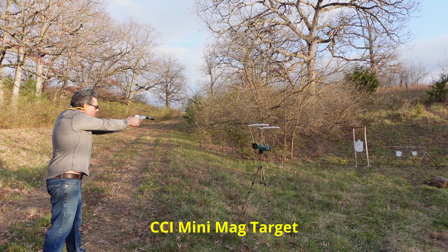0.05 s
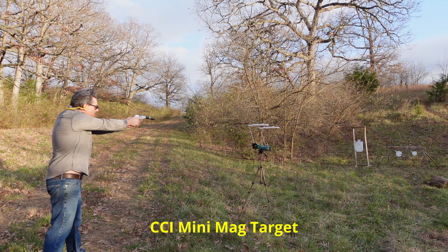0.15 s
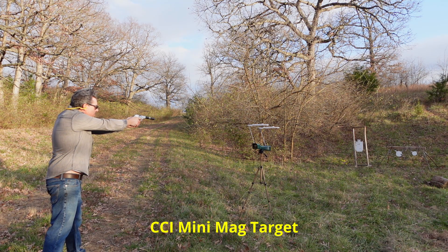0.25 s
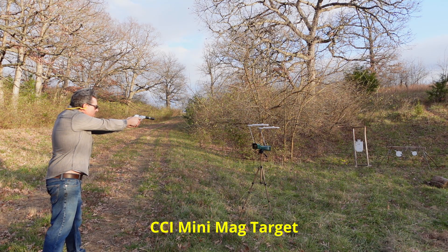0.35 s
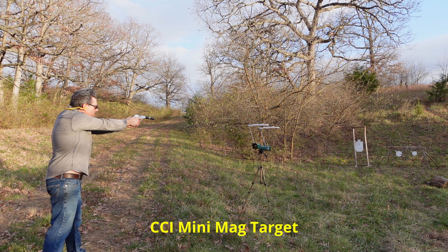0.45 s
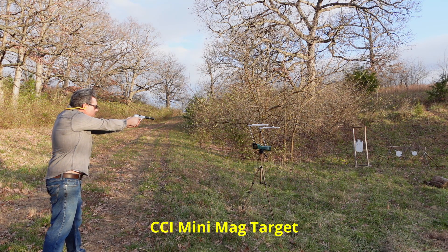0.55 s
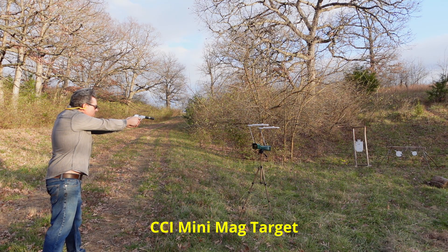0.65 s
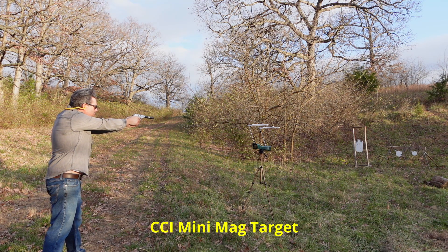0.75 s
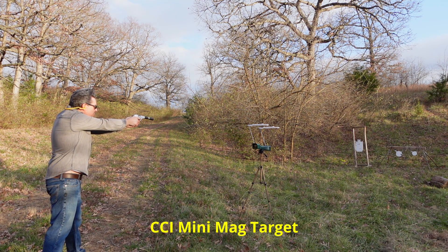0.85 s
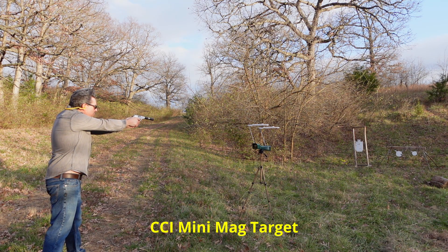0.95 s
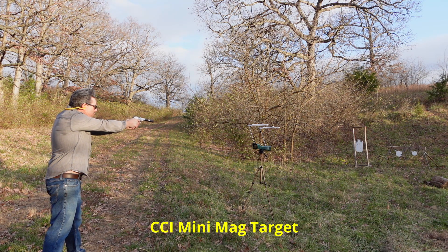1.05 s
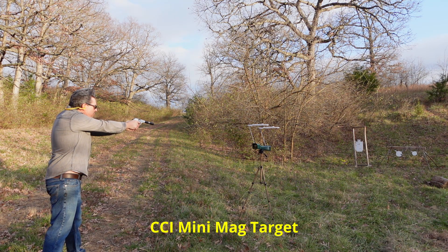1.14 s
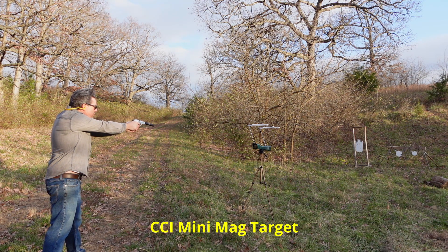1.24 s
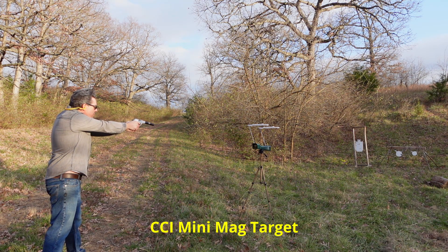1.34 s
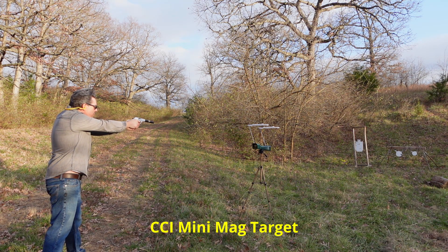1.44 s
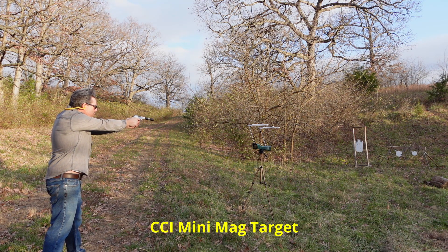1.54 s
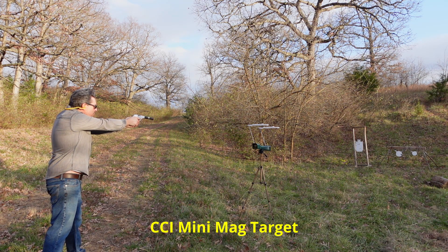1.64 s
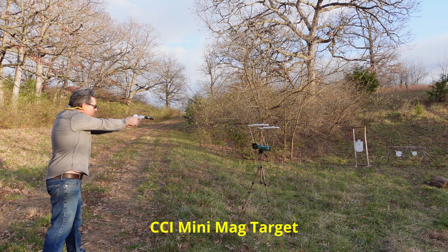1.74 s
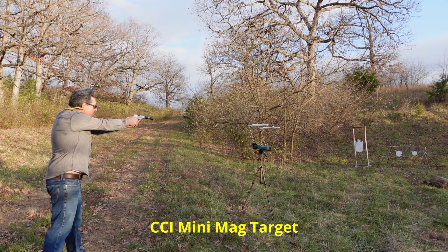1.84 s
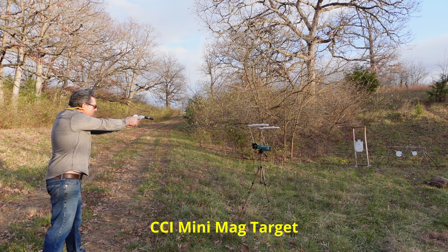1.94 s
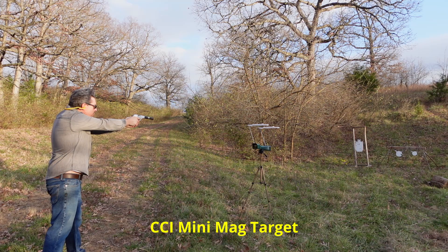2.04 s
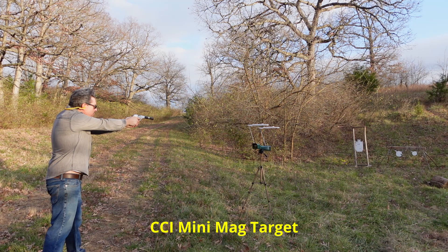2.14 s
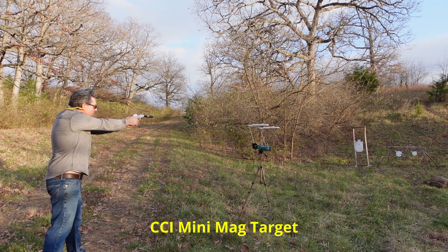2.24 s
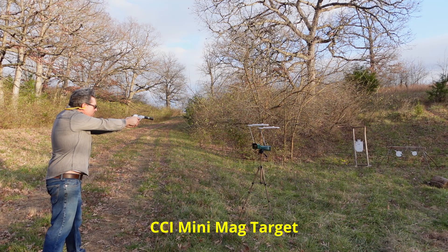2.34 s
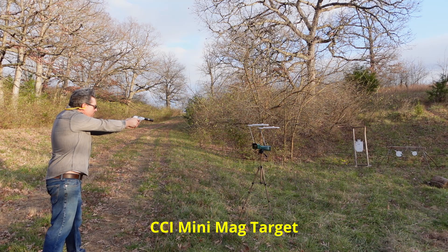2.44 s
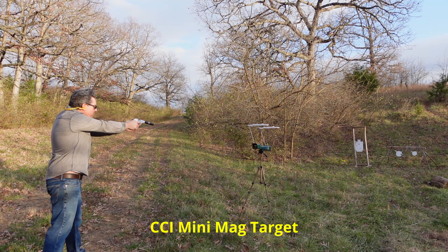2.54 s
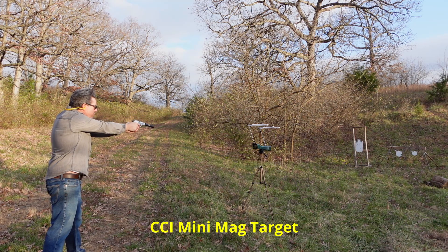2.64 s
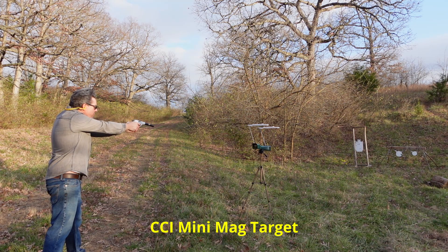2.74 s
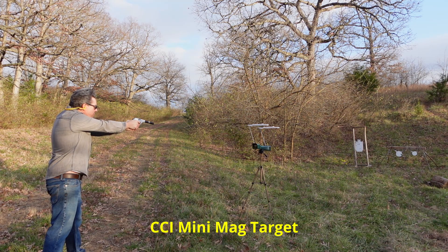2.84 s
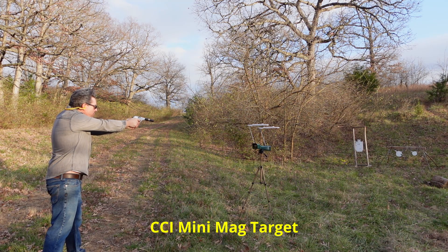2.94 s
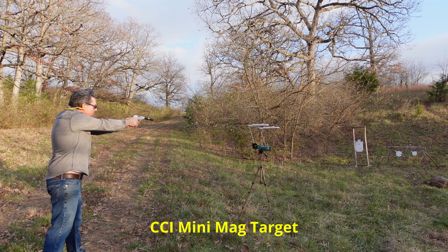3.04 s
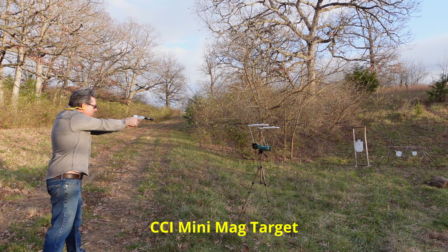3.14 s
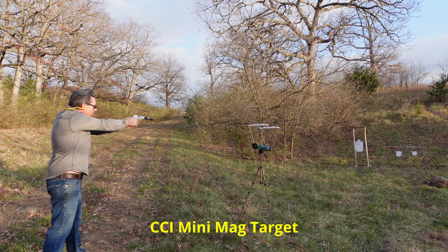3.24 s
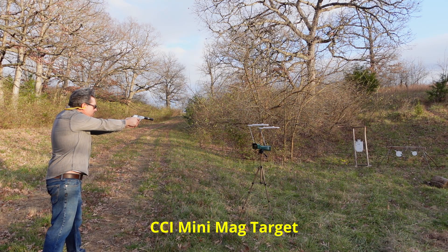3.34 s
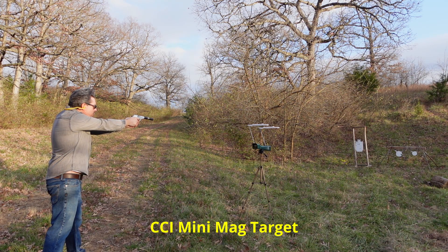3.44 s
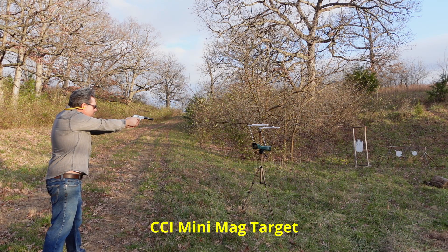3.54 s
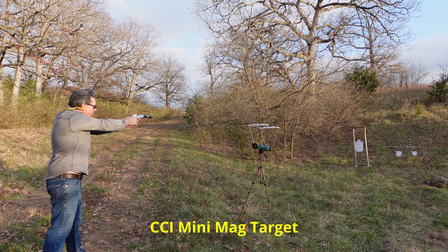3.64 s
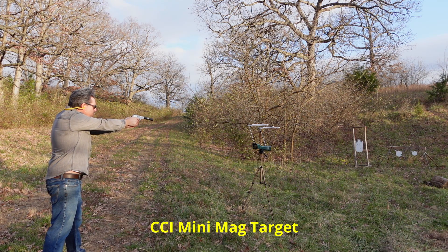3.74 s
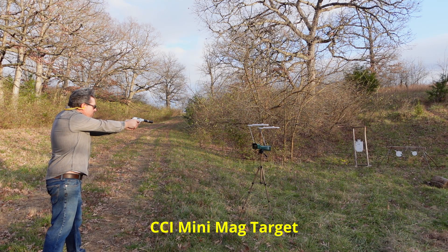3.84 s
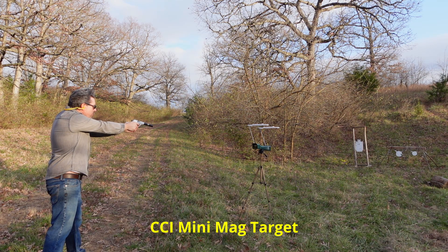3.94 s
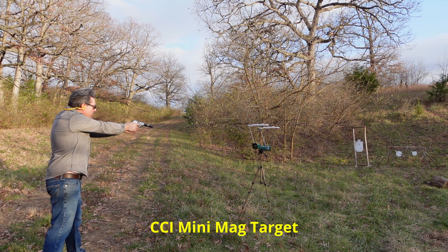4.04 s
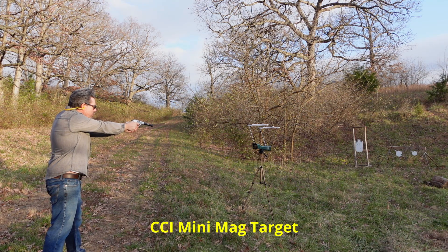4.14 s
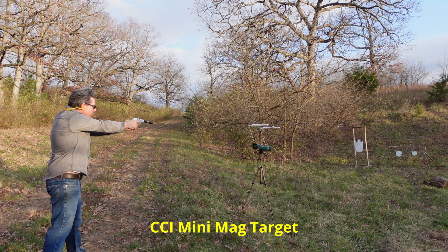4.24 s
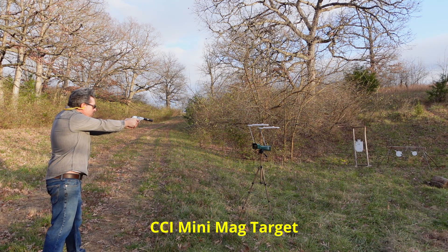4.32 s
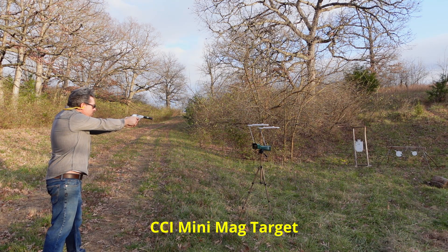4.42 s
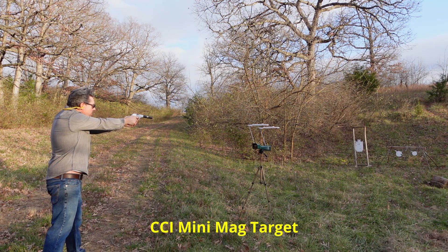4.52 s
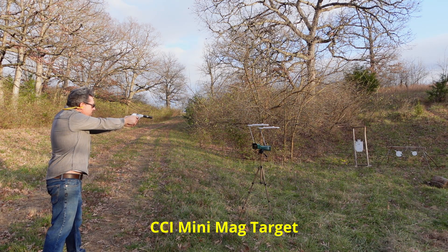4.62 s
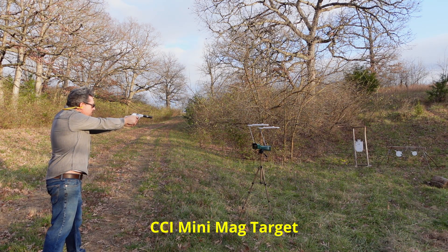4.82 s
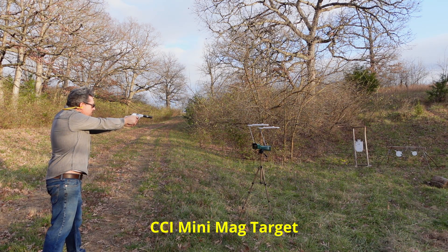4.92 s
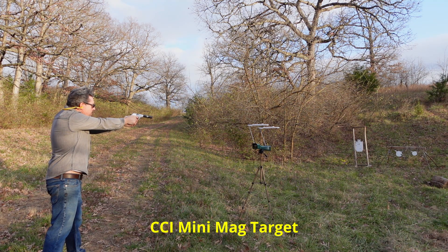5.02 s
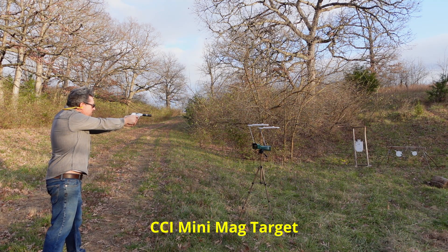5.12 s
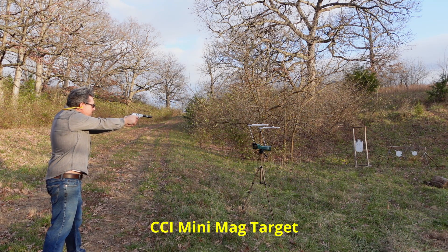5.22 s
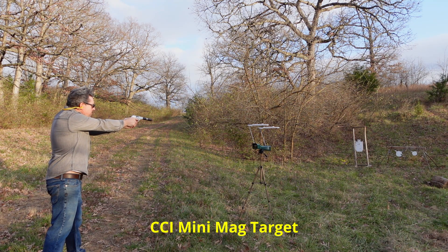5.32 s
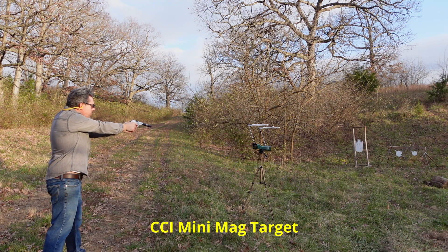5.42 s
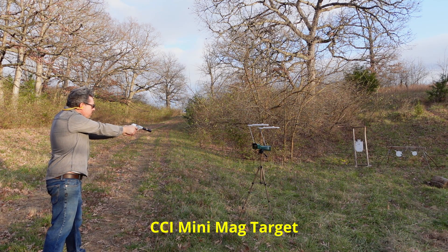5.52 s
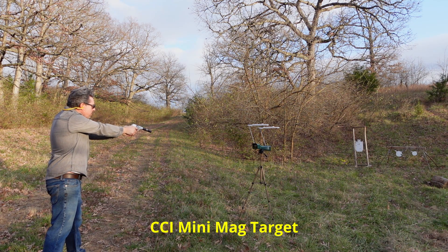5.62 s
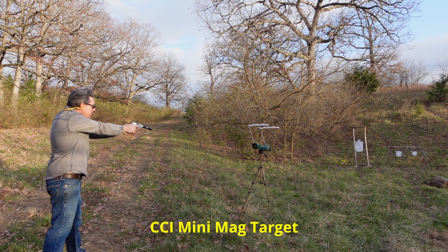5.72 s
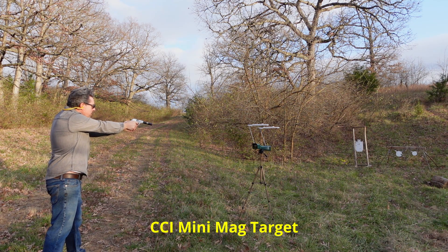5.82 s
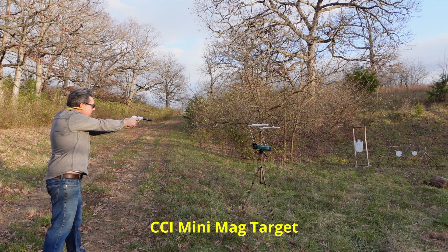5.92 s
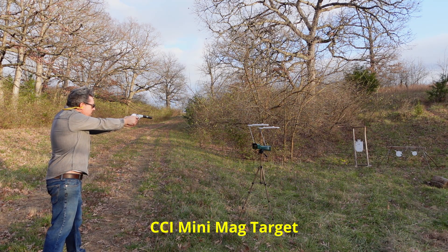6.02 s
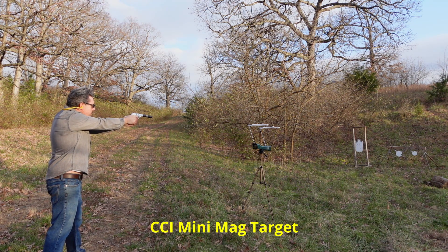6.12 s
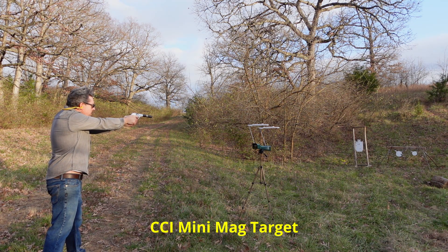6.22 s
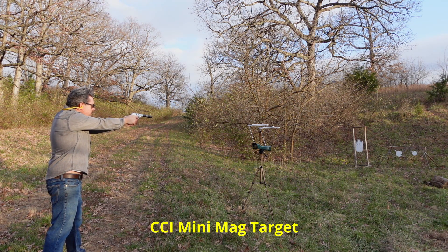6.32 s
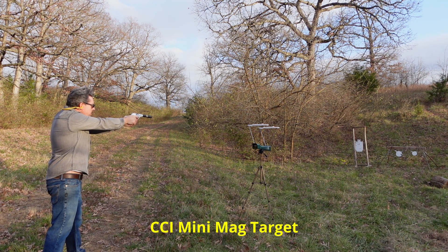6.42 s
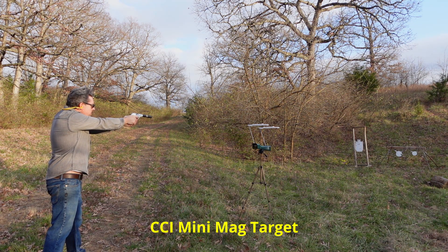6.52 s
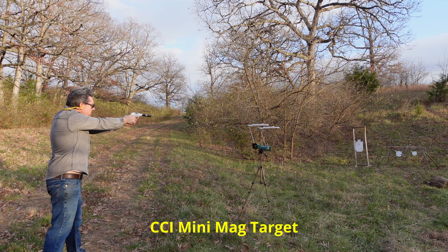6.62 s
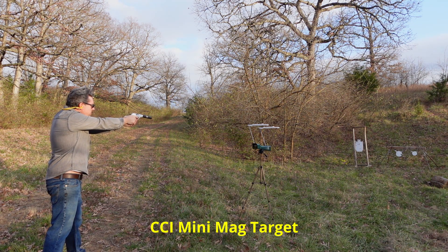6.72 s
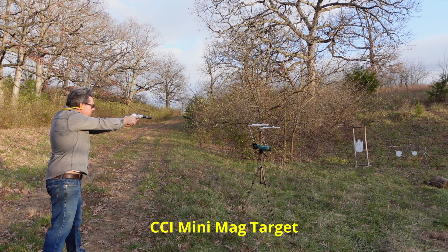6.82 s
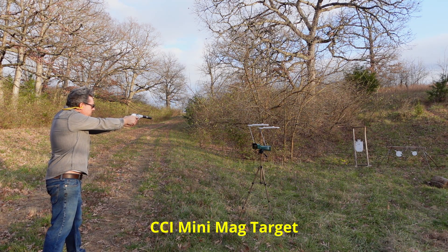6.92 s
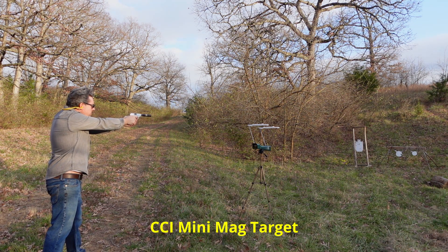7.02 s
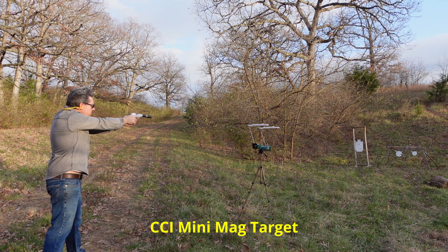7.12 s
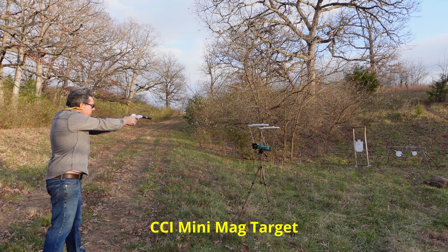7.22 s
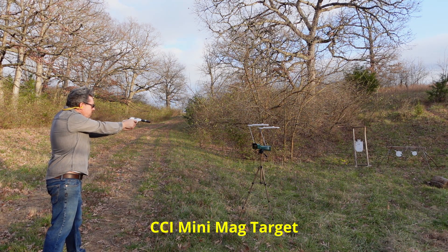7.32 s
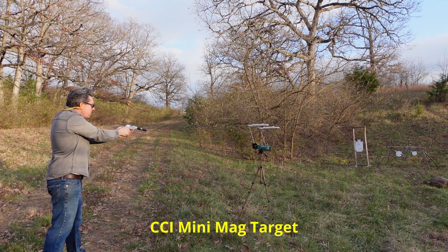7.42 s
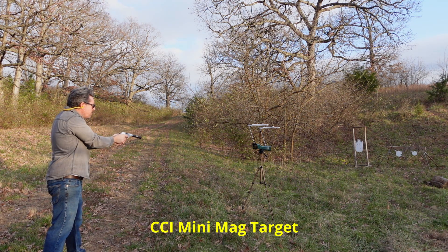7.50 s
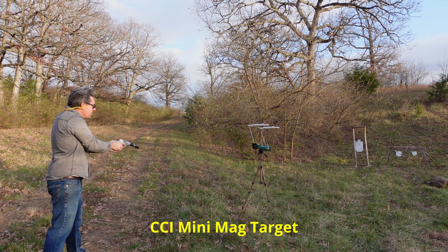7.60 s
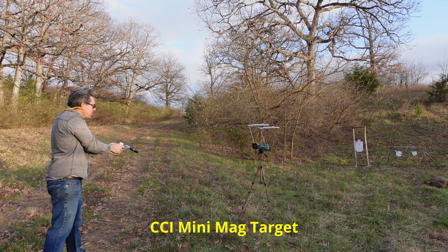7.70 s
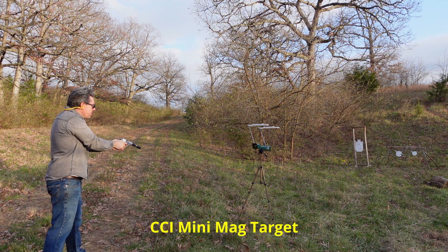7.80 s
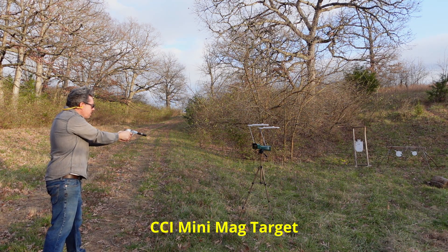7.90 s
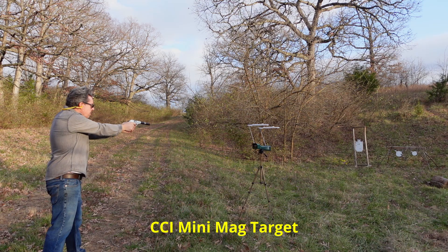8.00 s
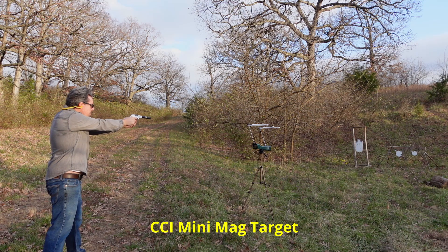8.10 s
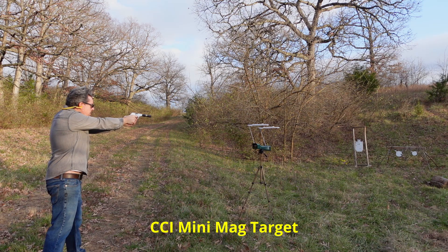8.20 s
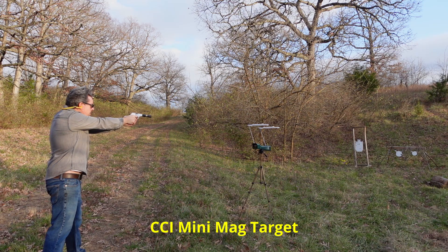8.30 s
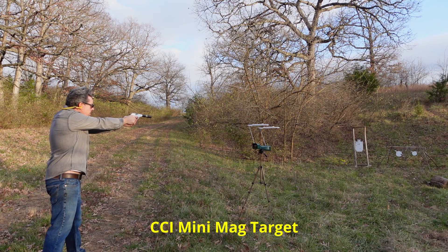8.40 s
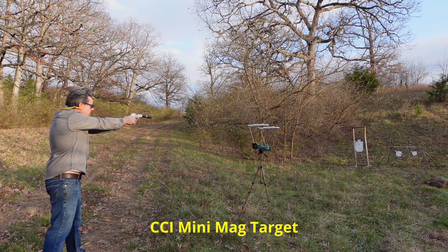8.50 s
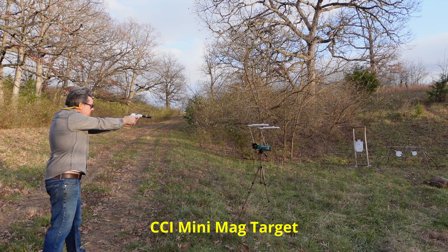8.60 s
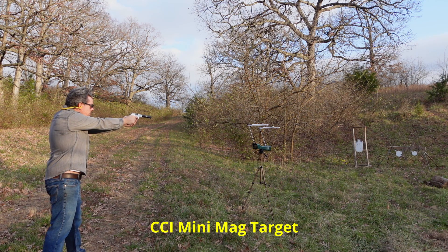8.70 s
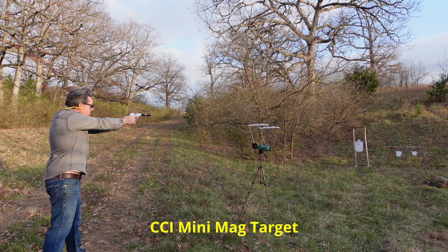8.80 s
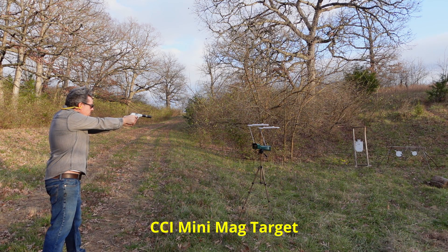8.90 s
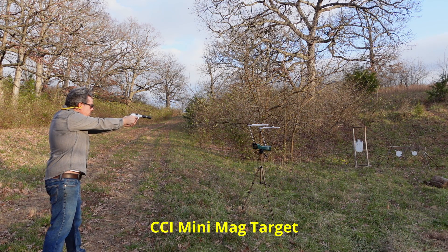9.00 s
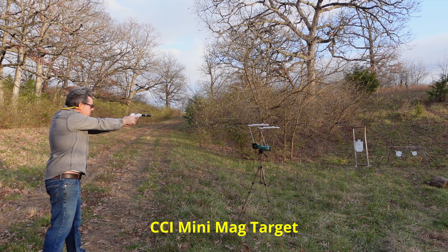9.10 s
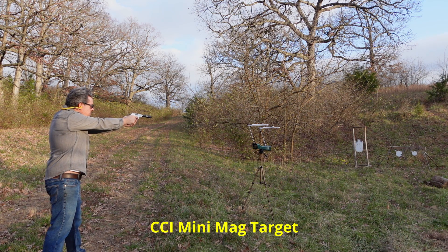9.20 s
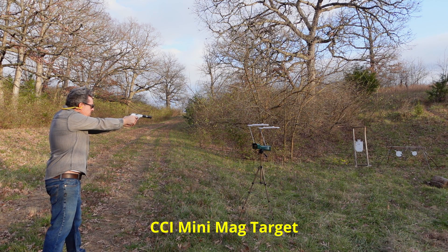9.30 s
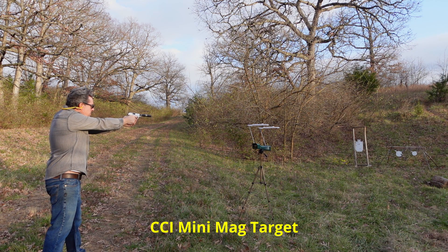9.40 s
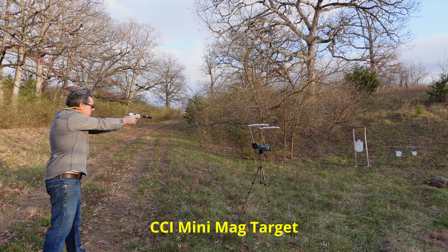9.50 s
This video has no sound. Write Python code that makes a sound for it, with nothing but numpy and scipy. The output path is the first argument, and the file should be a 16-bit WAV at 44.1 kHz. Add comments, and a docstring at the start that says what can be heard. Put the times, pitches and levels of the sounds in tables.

```python
"""A light wind blows over a field and a far bird whistles. Then a small pistol fires, a few metres from a
camera. Each blast scatters off grass and brush, the bullet smacks into an earth bank, and the woods roll
the bang back. Four shots come about a second and a half apart, each followed by a spent case dropping.
In the gaps small birds chirp, dry stalks snap and the camera's lens motor flutters now and then.
Two closer shots follow, more cases land, and three quick shots end the scene."""
import sys
import numpy as np
from scipy import signal
from scipy.fft import rfft, irfft, next_fast_len
from scipy.io import wavfile
from scipy.ndimage import map_coordinates

SR = 44100
rng = np.random.default_rng(int(sys.argv[2]) if len(sys.argv) > 2 else 0)


def log_audio(samples):
    """Write samples as a 16-bit WAV file to the path given in sys.argv[1]."""
    # one column per channel
    frames = np.atleast_2d(samples).T
    # limit to full scale, then quantise
    limited = np.clip(frames, -1, 1)
    pcm = np.round(limited * 32767).astype(np.int16)
    wavfile.write(sys.argv[1], SR, pcm)


N = 421155
CLOCK = np.arange(N) / SR  # seconds through the whole scene
T = np.arange(int(1.6 * SR)) / SR  # seconds through one sound and its echoes


# Each row: start in seconds, blast level in dB, echo level in dB, echo brightness in dB per octave,
# the echo's boosted pitch in Hz, its weakened pitch in Hz, size of that boost and cut in dB,
# seconds until the bullet's hit is heard, smack level in dB, thud level in dB, thud pitch in Hz.
PISTOL_SHOTS = [(0.7063, -0.5, 2, -0.5, 2730, 3500, 5, 0.071, -12, -15, 615),
                (2.2520, 1, 1.7, -0.5, 3460, 6540, 4.5, .0787, -11, -23, 610),
                (3.645, -0.5, 2, -.5, 1310, 1890, 2, 0.067, -15, -17, 600),
                (5.124, -1, 1, 0, 2540, 3095, 4, .0797, -10, -15, 550),
                (6.6042, -.5, 0.8, 0, 3740, 2270, 7, 0.084, -10.5, -4, 616),
                (7.0488, 0, 2, -0.43, 5320, 5000, 5.5, 0.078, -15, -11, 346),
                (8.828, -1.5, 0.95, -0.3, 5500, 2450, 4, .0790, -7.5, -16.5, 595),
                (9.1199, 0, 0.5, -0.5, 5570, 1840, 3, 0.082, -9, -3, 795),
                (9.3973, -0.5, 1.1, -0.4, 6450, 2480, 4.5, 0.082, -5.5, -10.5, 744)]

def pistol(change=0.47):
    """Every shot meets the same land, along paths that the moving air alters a little."""
    out, land = np.zeros(N), landscape()
    for start, db, echo_db, tilt_db, peak_hz, hollow_hz, depth_db, flight, *hit in PISTOL_SHOTS:
        echo = np.sqrt(1 - change) * land + np.sqrt(change) * landscape()
        add(out, start, amp(db) * blast())
        echo_tone = gas_cloud(tilt_db, peak_hz, hollow_hz, depth_db)
        add(out, start, amp(echo_db) * filtered(echo, echo_tone))
        add(out, start + flight, impact(*hit))
    return out


# The sudden jumps in air pressure that begin a bang. Each row: delay in seconds, level in dB,
# fading time in seconds.
SHOCK_FRONTS = [(0, -14, .003), (.0013, -3, 0.0021), (.0025, -12, 0.0014), (.0044, -11.5, .0018),
                (.0100, -24.5, .004)]
# The tone of the sharp crack and of the low push. Each row: frequency in Hz, level in dB.
CRACK_TONE = [(410, -26), (700, -3), (1150, -3), (1680, -3.5), (2330, -4), (2990, -4), (3500, -2.5),
              (4100, 1), (4550, -4), (5400, 0.5), (7200, -5.5), (8420, 1.5), (10100, -13.5), (13500, -6),
              (16000, -17.5)]
PUSH_TONE = [(30, -19), (90, -8.5), (170, -10), (260, -3), (350, 0), (520, -5), (650, -1.5), (1000, -15.5),
             (1600, -22), (4000, -59.5)]

def blast(push_db=-7.5, push_delay=0.0016, swirl_db=-27):
    """Gas bursts from the barrel: ragged shock fronts ride on one low, swirling push."""
    t = T[:SR // 10]
    power = sum((amp(db) * burst(t - delay, life, 0.00022)) ** 2 for delay, db, life in SHOCK_FRONTS)
    out = noise(colour(CRACK_TONE), len(t)) * np.sqrt(power)
    add(out, push_delay, amp(push_db) * pulse(colour(PUSH_TONE)))
    add(out, push_delay, amp(swirl_db) * noise(band(460, 0.34), len(t)) * burst(t, 0.0038, 0.0013))
    return out


def gas_cloud(tilt_db, peak_hz, hollow_hz, depth_db, width_hz=230, ripple_hz=190, ripple_db=1.5):
    """Each shot's gas cloud is ragged in its own way and gives its echoes their own tone."""
    bumps = rng.standard_normal(256)
    def response(hz):
        bell = lambda centre: np.exp(-0.5 * ((hz - centre) / width_hz) ** 2)
        ripple = ripple_db * map_coordinates(bumps, [hz / ripple_hz], mode="nearest") * hz / (hz + 2200)
        tilt = tilt_db * np.log2((hz + 300) / 2500)
        return amp(depth_db * (bell(peak_hz) - bell(hollow_hz)) + ripple + tilt)
    return response


def impact(smack_db, thud_db, thud_hz):
    """The bullet meets the bank: a sharp smack and a dead thud that the trees answer."""
    t = T[:SR // 3]
    smack = noise(band(3500, 0.92), len(t)) * burst(t, 0.0015, 0.0001)
    thud = np.sin(2 * np.pi * thud_hz * t) * burst(t, 0.0012, 0.00058) * 1.87
    answer = noise(band(thud_hz, 0.6), len(t)) * burst(t, 0.041, 0.0065) * amp(-25.5)
    return amp(smack_db) * smack + amp(thud_db) * (thud + answer)


# Stretches of land that echo. Each row: delay of the near edge in seconds, delay of the far edge in
# seconds, level in dB, drop between the edges in dB per second, fade afterwards in dB per second.
NEAR_LAND = [(.0065, .015, -22, -0.5, 500), (.028, .077, -25, 41, 200)]  # the ground around the shooter, the nearest thicket
FAR_LAND = [(.062, .175, -30.5, -1, 223), (.20, .61, -39, 15.5, 200), (.62, .88, -48.5, 13.5, 62)]  # the tree line, the wood behind it, the far hillside
# The tone of echoes from twigs and from trees. Each row: frequency in Hz, level in dB.
TWIG_TONE = [(60, -27), (200, -12), (400, -9.5), (700, 1.5), (1300, -5.5), (2200, -2), (3200, -4),
             (4300, -0.5), (6000, 1), (8300, 1), (10000, -6.5), (14000, -7.5), (16000, -17)]
TREE_TONE = [(60, -17.5), (150, -5.5), (280, -16.5), (450, -1.5), (1000, 1.5), (1800, 1), (2600, 0.5),
             (3200, -1), (4300, 3), (6500, 2), (8500, -1), (10500, -12), (16000, -22.5)]
# Clear echoes off banks, boards and trunks. Each row: delay in seconds, level in dB,
# fading time in seconds, middle frequency in Hz.
SLAPS = [(.011, -25, .007, 750), (.0327, -20.5, .002, 7000), (0.0629, -16, .0022, 1497),
         (.0648, -10, 0.0014, 1400), (0.0716, -15, 0.0031, 2200), (.100, -29.5, 0.0036, 700),
         (.160, -24.5, 0.011, 650), (.218, -34, 0.0062, 474), (.341, -36.5, .017, 520),
         (.405, -43, .018, 700), (.522, -42, 0.014, 707), (.578, -43.5, 0.016, 860),
         (.707, -39.5, 0.0033, 1610), (.884, -46.5, 0.0048, 824)]

def landscape(air_db_per_khz_s=4.5, slap_octaves=1.1, clump_db=2.13):
    """The land throws one shot back: first the brush nearby, then the long roll of the woods."""
    woods = stretches(FAR_LAND)
    clumps = amp(clump_db * wobble(130)[:len(T)])  # thickets answer unevenly
    far = noise(colour(TREE_TONE), len(T)) * clumps * woods + trunks(woods)
    t = T[:SR // 6]
    for delay, db, life, centre_hz in SLAPS:
        add(far, delay, amp(db) * noise(band(centre_hz, slap_octaves), len(t)) * burst(t, life, life / 5))
    hz, travel_s, spectrum = signal.stft(far, SR, nperseg=256)
    air_loss = amp(-air_db_per_khz_s * np.outer(hz / 1000, travel_s))  # long paths lose their treble
    brush = noise(colour(TWIG_TONE), len(T)) * stretches(NEAR_LAND)
    return brush + signal.istft(spectrum * air_loss, SR, nperseg=256)[1][:len(T)]


def stretches(rows, rise_share=0.055):
    """How loud the land's echo is over time: each stretch swells, holds or sags, then fades."""
    power = 0
    for near, far, db, sag, fade in rows:
        elapsed = np.maximum(T - near, 0)
        swell = 1 - np.exp(-elapsed / (rise_share * far))
        level_db = db - sag * np.minimum(elapsed, far - near) - fade * np.maximum(T - far, 0)
        power += (swell * amp(level_db)) ** 2
    return np.sqrt(power)


def trunks(woods, count=64, per_s=26, trunk_db=-5.5, spread_db=4.0, life=0.009):
    """Weaker low slaps come back from single trunks, strewn at random through the woods."""
    swells = np.zeros(len(T))
    delays = (np.arange(count) + rng.random(count)) / per_s
    for delay, size in zip(delays, rng.standard_normal(count)):
        add(swells, delay, amp(spread_db * size) * burst(T[:SR // 10], life, life / 5))
    return amp(trunk_db) * swells * woods * noise(band(620, 0.99), len(T))


# Spent cases hitting the ground. Each row: landing time in seconds, level in dB, ring level in dB
# relative to that, seconds spent falling through the grass, grass level in dB.
CASE_DROPS = [(1.556, -34, -5.5, 0.008, -42), (3.021, -43, -10, .008, -55), (4.463, -44, -4, 0.023, -46.5),
              (6.010, -48.5, -7, .013, -47.5), (7.401, -41.5, -5, .011, -47), (7.819, -49.5, -7, .004, -55),
              (7.989, -60, -13, .003, -68)]
# The notes a brass case rings with. Each row: pitch in Hz, level in dB, seconds to fade by 60 dB.
BRASS_NOTES = [(2579, -32, 0.21), (3338, -27, 0.27), (5100, 0.5, 0.029), (6000, -9, 0.05),
               (8500, -9, 0.038), (8700, -2, 0.033), (9055, -7, 0.075), (10650, -28, 0.073)]

def cases(grass_fade_s=0.013, landing_fade_s=0.0087):
    """Brass cases scuff through dry grass, land and ring briefly."""
    out, t = np.zeros(N), T[:SR // 5]
    scuff = lambda life: noise(band(2450, 1.94), len(t)) * burst(t, life, 0.0012)
    for landing, db, ring_db, fall, grass_db in CASE_DROPS:
        add(out, landing - fall, amp(grass_db) * scuff(grass_fade_s))
        add(out, landing, amp(db) * (scuff(landing_fade_s) + amp(ring_db) * ring(BRASS_NOTES)))
    return out


# When the lens motor runs. Each row: start in seconds, stop in seconds, level in dB.
MOTOR_RUNS = [(1.635, 2.25, -54.5), (6.111, 6.60, -54), (8.447, 8.821, -64)]
# The notes the lens barrel rings with. Each row: pitch in Hz, level in dB, seconds to fade by 60 dB.
BARREL_NOTES = [(108, -7.5, 0.055), (177, -4.5, 0.061), (230, 1.5, .08), (283, -4, 0.039),
                (440, -13.5, .03)]

def lens_motor(steps_per_s=30, jitter_s=0.00036, grind_db=-8):
    """The focus motor moves in quick steps, knocking the lens barrel while its gears grind."""
    out = np.zeros(N)
    for start, stop, db in MOTOR_RUNS:
        add(out, start, amp(db + grind_db) * noise(band(275, 0.12), int((stop - start) * SR)))
        for step in np.arange(start, stop, 1 / steps_per_s):
            add(out, step + jitter_s * rng.standard_normal(), amp(db) * ring(BARREL_NOTES))
    return out


# Stalks snapping. Each row: start in seconds, level in dB.
STALK_SNAPS = [(3.164, -61.5), (3.192, -57), (3.439, -56.5), (6.3308, -50), (6.40, -58)]

def stalks():
    """Dry stalks snap with tiny ticks."""
    out, t = np.zeros(N), T[:SR // 20]
    for start, db in STALK_SNAPS:
        add(out, start, amp(db) * noise(band(3500, 0.95), len(t)) * burst(t, 0.0066, 0.0003))
    return out


# Nearby bird notes. Each row: start in seconds, length in seconds, top pitch in Hz,
# where the top falls in the note from 0 to 1, level in dB.
NEAR_CHIRPS = [(1.926, .052, 6600, 0.3, -62), (2.139, .088, 8750, .5, -67), (4.473, .07, 7720, 0.84, -65.5),
               (4.573, 0.054, 7520, .8, -61.5), (4.687, 0.054, 7720, 0.9, -61.5),
               (4.778, .056, 7680, 0.9, -63), (4.887, .056, 7850, .8, -65), (4.99, 0.058, 7850, .8, -64.5),
               (7.712, .05, 6170, 0.57, -61.5)]
# Distant bird notes. Each row: start in seconds, length in seconds, starting pitch in Hz, level in dB.
FAR_WHISTLES = [(-.1, 0.44, 3560, -77.5), (.397, 0.39, 3620, -75), (1.677, 0.46, 3670, -75),
                (1.70, 0.2, 4400, -78), (1.8, .38, 3360, -75), (3.359, 0.37, 3500, -80),
                (4.731, .42, 3630, -73), (6.05, 0.52, 3510, -72), (7.909, .3, 3620, -74.5),
                (8.13, 0.63, 3380, -78.5)]

def birds(rise_share=0.19, drop_share=0.25, sag_hz_per_s=500, echo_db=-8):
    """Thin chirps sweep up and drop nearby, and blurred whistles slide down deep in the wood."""
    near, far = np.zeros(N), np.zeros(N)
    note = lambda hz: np.hanning(len(hz)) ** 0.5 * np.sin(2 * np.pi * np.cumsum(hz) / SR)
    for start, length, top_hz, top_place, db in NEAR_CHIRPS:
        progress = np.linspace(0, 1, int(length * SR))
        from_top = np.interp(progress, [0, top_place, 1], [-1, 0, 1])
        hz = top_hz * (1 - np.where(from_top < 0, rise_share, drop_share) * from_top ** 2)
        add(near, start, amp(db) * note(hz))
    for start, length, start_hz, db in FAR_WHISTLES:
        hz = start_hz - sag_hz_per_s * T[:int(length * SR)]
        blur = 0.9 + 0.6 * noise(lambda f: np.exp(-(f / 100) ** 2), len(hz))  # the trees smear the note
        add(far, start, amp(db) * blur * note(hz))
    tail = rng.standard_normal(len(T)) * burst(T, 0.12, 0.02)
    echo = signal.fftconvolve(near, tail / np.linalg.norm(tail))[:N]
    return near + far + amp(echo_db) * echo


# The tone of open air, of wind on the microphone and of dry grass. Each row: frequency in Hz, level in dB.
HUSH_TONE = [(35, -28), (60, -5), (121, -7), (156, -18), (281, -18), (398, -17), (698, -21), (785, -25.5),
             (1660, -29), (2520, -32.5), (3120, -29.5), (4420, -35), (16000, -48)]
BUFFET_TONE = [(10, 4.5), (25, -0.5), (45, -10.5), (90, -21), (160, -33), (400, -62.5)]
GRASS_TONE = [(300, -30.5), (1500, 0), (4000, 0.5), (6500, -2), (8500, -1), (10500, -12.5), (15000, -12)]
# Spans of low wind rumble on the microphone; the low rumble is loud between shots and quiet just after each
# bang. Each row: # start in seconds, stop in seconds, level in dB.
WIND_RUMBLE_SPANS = [(0.317, .66, -50), (1.245, 1.6, -48), (2.0, 2.22, -51.5), (2.55, 3.25, -50), (3.4, 3.68, -53),
                     (3.98, 4.05, -50.5), (4.6, 5.07, -54), (5.6, 6.55, -57), (7.644, 7.92, -57)]
# The dry grass stirs twice. Each row: loudest moment in seconds, level in dB.
GRASS_STIRS = [(3.08, -66.5), (5.98, -61.5)]

def breeze(hush_db=-62.5, lull_db=-68.5, grass_rest_db=-89.5, flutter_db=2.0, crackle_db=4.5):
    """Light wind makes a hush, softly buffets the microphone and sets dry grass crackling."""
    hush = amp(hush_db + 0.87 * wobble(2.8)) * noise(colour(HUSH_TONE), N)
    gusts = [amp(db - 89.5 * np.abs(CLOCK - np.clip(CLOCK, start, stop)))  # edges slope 89.5 dB a second
             for start, stop, db in WIND_RUMBLE_SPANS]
    wind = amp(lull_db) + np.max(gusts, axis=0)
    buffet = amp(flutter_db * wobble(14)) * wind * noise(colour(BUFFET_TONE), N)
    stir = amp(grass_rest_db)
    for peak, db in GRASS_STIRS:  # each rises 27.5 dB a second and falls 12.5 dB a second
        stir = stir + amp(db - np.maximum(27.5 * (peak - CLOCK), 12.5 * (CLOCK - peak)))
    crackle = unit(amp(crackle_db * wobble(500)) * noise(colour(GRASS_TONE), N))
    return hush + buffet + stir * crackle


def amp(db):
    """Turn decibels into a number to multiply by."""
    return 10 ** (np.asarray(db) / 20)


def unit(x):
    """Scale a sound to an average (rms) level of 1."""
    return x / np.sqrt(np.mean(x ** 2) + 1e-20)


def colour(points):
    """A tone curve drawn through (Hz, dB) points."""
    point_hz, db = np.transpose(points)
    return lambda hz: amp(np.interp(np.log(hz + 1), np.log(point_hz), db))


def band(centre_hz, octaves):
    """A bell-shaped tone curve around one pitch."""
    return lambda hz: np.exp(-0.5 * (np.log2((hz + 1) / centre_hz) / octaves) ** 2)


def filtered(x, response):
    """Shape a sound with a tone curve, without delaying it."""
    size = next_fast_len(len(x) + 4096, True)
    return irfft(rfft(x, size) * response(np.fft.rfftfreq(size, 1 / SR)), size)[:len(x)]


def noise(response, size):
    """Noise with this tone curve, at an average level of 1."""
    return unit(filtered(rng.standard_normal(size), response))


def pulse(response, size=4096):
    """One sudden pulse of height 1 with this tone curve."""
    cepstrum = irfft(np.log(response(np.fft.rfftfreq(size, 1 / SR)) + 1e-6))
    cepstrum[1:size // 2] *= 2  # folding onto the first half packs the energy at the start
    cepstrum[size // 2 + 1:] = 0
    wave = irfft(np.exp(rfft(cepstrum)))
    return wave / np.abs(wave).max()


def burst(t, life, rise):
    """A quick rise and a smooth fade from t = 0; life and rise are in seconds."""
    t = np.maximum(t, 0)
    return (1 - np.exp(-t / rise)) * np.exp(-t / life)


def wobble(rate):
    """A smooth curve through `rate` random values a second."""
    return map_coordinates(rng.standard_normal(int(N * rate / SR) + 4), [CLOCK * rate])


def ring(notes):
    """A struck object's fading notes, at new strengths for each blow."""
    t = T[:SR // 5]
    return sum(amp(db + rng.normal(0, 2.5) - 60 * t / fade_s) * np.sin(2 * np.pi * hz * t)
               for hz, db, fade_s in notes)


def add(out, start, x):
    """Mix x into out at `start` seconds."""
    i = round(start * SR)
    x = x[max(-i, 0):max(len(out) - i, 0)]
    out[max(i, 0):][:len(x)] += x


def scene():
    """All the sounds meet at one microphone."""
    return (pistol() + cases() + stalks() + birds() + lens_motor() + breeze())[None]


def record(dry):
    """The camera rounds off the highest peaks and cuts away the very top of the treble."""
    ceiling, top_hz = 0.66, 15800
    rounded = dry[0] / (1 + (dry[0] / ceiling) ** 4) ** (1 / 4)
    return filtered(rounded, lambda hz: 1 / np.sqrt(1 + (hz / top_hz) ** 200))[None]


dry = scene()
out = record(dry)
log_audio(out)
```